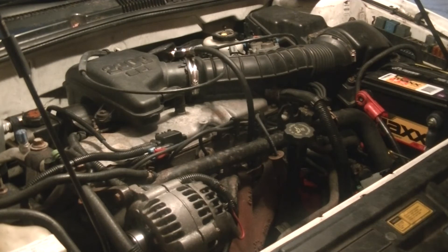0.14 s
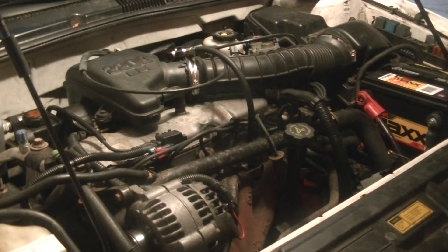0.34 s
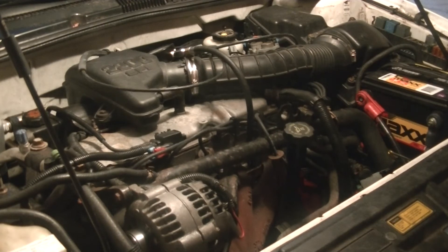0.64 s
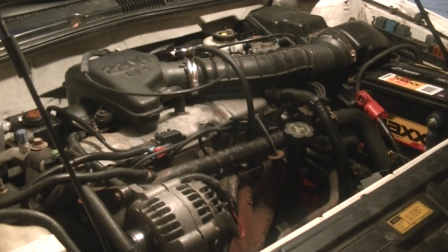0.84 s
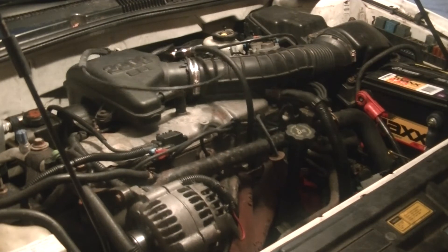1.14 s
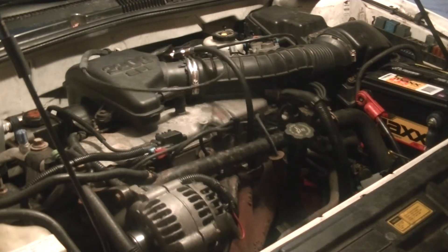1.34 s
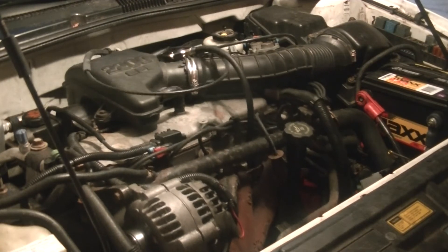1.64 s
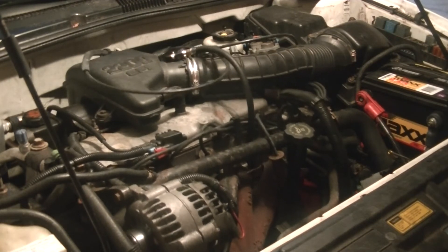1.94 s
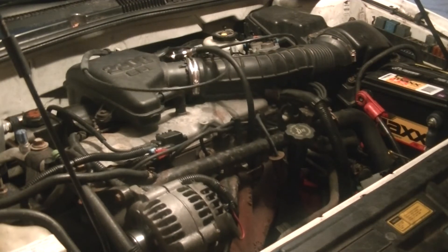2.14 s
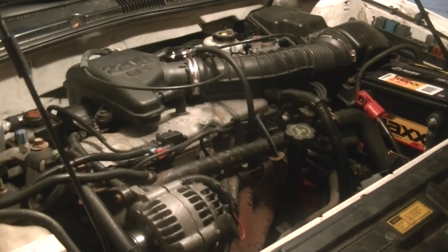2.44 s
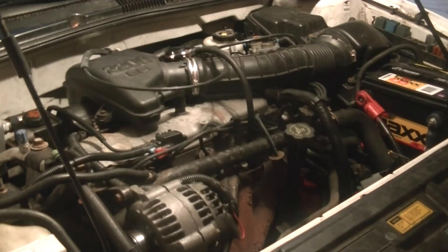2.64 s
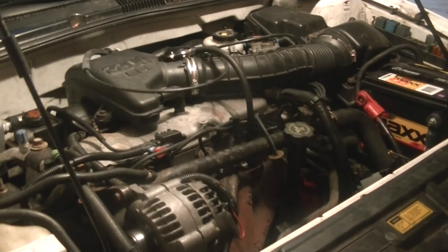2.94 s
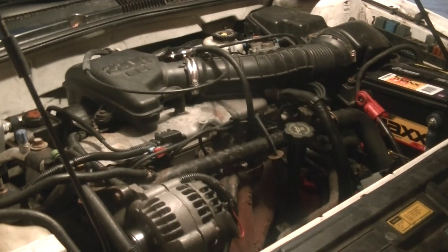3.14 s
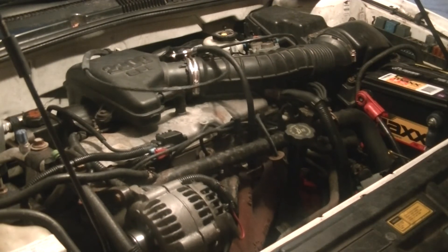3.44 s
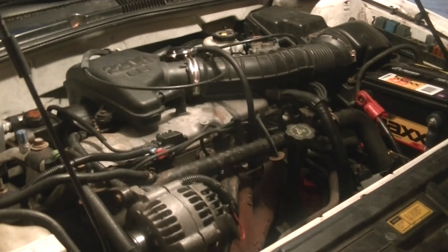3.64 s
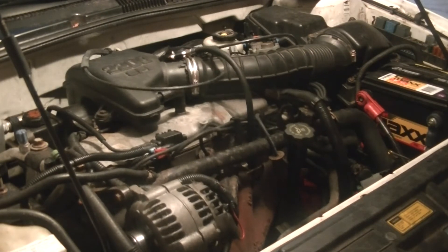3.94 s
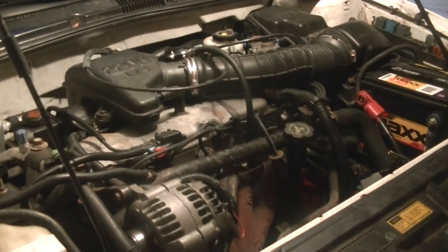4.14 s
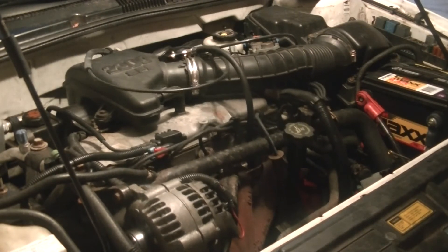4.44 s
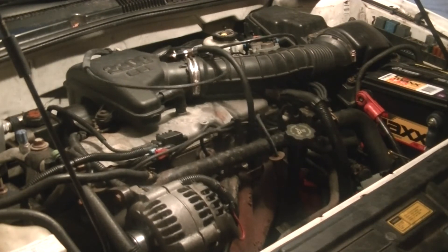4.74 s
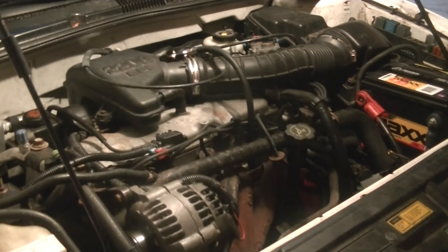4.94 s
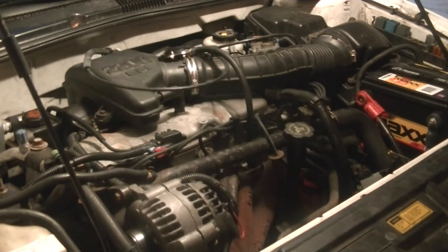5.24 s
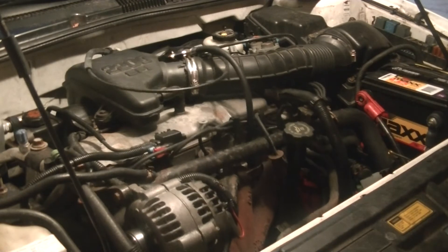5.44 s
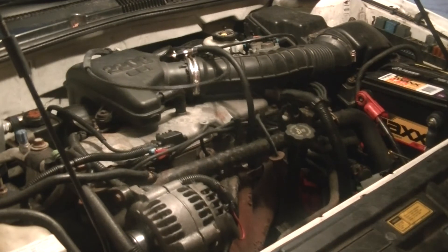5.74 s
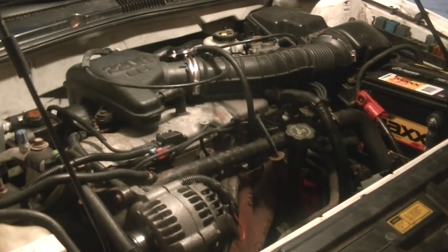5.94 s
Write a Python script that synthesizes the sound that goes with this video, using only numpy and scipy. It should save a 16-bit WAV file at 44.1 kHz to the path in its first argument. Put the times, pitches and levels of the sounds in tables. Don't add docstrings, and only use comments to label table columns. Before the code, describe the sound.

A car starter clacks into engagement, stumbles briefly, then cranks the engine over and over at about nine chugs a second without it catching.

```python
import sys
import numpy as np
from scipy import signal
from scipy.fft import rfft, irfft
from scipy.io import wavfile
from scipy.ndimage import uniform_filter1d

SR = 44100
rng = np.random.default_rng(int(sys.argv[2]) if len(sys.argv) > 2 else 0)


def to_wav(sig):
    pcm = np.clip(np.atleast_2d(sig), -1, 1) * 32767
    pcm = np.round(pcm).astype(np.int16)
    wavfile.write(sys.argv[1], SR, pcm.T)


N = 268569

# frequency in Hz, width in Hz, level in dB.
CASTING_MODES = [(770, 25, -4), (846, 18, 2), (1000, 25, -4), (1307, 35, 2), (1412, 35, 1), (1500, 30, -3),
                 (1576, 27, 0), (1710, 35, -1), (1850, 40, -1), (1900, 30, -1), (2000, 32, 1),
                 (2164, 30, 1), (2280, 30, 1), (2380, 25, 0), (2440, 30, -1), (2830, 40, -2), (3047, 40, 0),
                 (3310, 50, 0), (3420, 50, 0), (3550, 50, -1), (3821, 40, 0), (3990, 60, 0), (4168, 45, 0),
                 (4500, 60, -3), (5752, 25, -7), (6035, 30, -11)]
# frequency in Hz, width in Hz, level in dB.
SUMP_MODES = [(220, 18, -6), (258, 18, -4), (315, 20, -8), (345, 20, -7), (444, 18, -3), (515, 20, -2),
              (606, 30, 0), (650, 25, -2)]
# time in seconds, clack in dB, thud minus clack in dB, clang minus clack in dB.
FIRST_SLAMS = [
    (0.1396, -11.5, -15, -11),
    (0.2906, -15.5, -9, 2),
    (0.4261, -17.5, -9, 10),
    (0.4934, -13, -19, 3),
    (0.5975, -13, -18, 3.5),
    (0.7142, -9, -25, -8),
    (0.8187, -10.5, -18, -7),
]
# start in seconds, first clack in dB, second clack in dB, ring in dB.
TURNS = [(0.9285, -13.5, -13, -41), (1.1603, -12, -10.5, -26), (1.3902, -10.5, -11, -30),
         (1.6121, -10, -13.5, -21), (1.8266, -11, -10.5, -36), (2.0357, -15, -10, -23),
         (2.2584, -14, -9, -17), (2.4714, -13, -11, -24), (2.6886, -9, -10, -25), (2.9032, -11.5, -9, -25),
         (3.1231, -10.5, -10, -30), (3.3392, -14.5, -11, -16), (3.5551, -11, -11.5, -37),
         (3.774, -13, -13, -29), (3.9894, -9, -11, -28), (4.2084, -12, -8.5, -30),
         (4.4287, -11.5, -12.5, -29), (4.6487, -12, -11, -19), (4.8692, -10, -9, -28),
         (5.0882, -9, -9.5, -30), (5.31, -10, -13, -24), (5.5292, -10.5, -13, -24), (5.7515, -13, -9, -25),
         (5.9746, -10, -10, -20)]
PINION_HIT_S = FIRST_SLAMS[0][0]
SAG_DB_PER_S = 0.3762


def undb(db):
    return np.exp(np.asarray(db) * (np.log(10) / 20))


def unit(x):
    return x / np.sqrt(np.mean(x ** 2))


def colour(x, outline):
    hz, db = np.transpose(outline)
    size = 4096
    bins_hz = np.fft.rfftfreq(size, 1 / SR)
    log_gain = np.log(undb(np.interp(np.log(bins_hz + 1), np.log(hz), db)))
    cepstrum = irfft(log_gain)
    cepstrum[1:size // 2] *= 2
    cepstrum[size // 2 + 1:] = 0
    response = irfft(np.exp(rfft(cepstrum)))
    return signal.fftconvolve(x, response)[:N]


def walk(per_s):
    size = int(SR / per_s)
    held = np.repeat(rng.standard_normal(N // size + 1), size)
    return 0.89 * uniform_filter1d(held, size)[:N]


def ring(x, modes, narrow, wander_db=0):
    total = 0
    for k, (hz, width_hz, db) in enumerate(modes):
        drive = x * undb(wander_db * walk(per_s=30))
        b, a = signal.iirpeak(hz, hz / (narrow * width_hz), SR)
        total = total + (-1) ** k * undb(db) * signal.lfilter(b, a, drive)
    return total


def band(x, lo_hz, hi_hz):
    return signal.sosfilt(signal.butter(2, [lo_hz, hi_hz], "band", fs=SR, output="sos"), x)


def impacts(per_s, spread_db):
    when, sign, strength = rng.random((N, 3)).T
    hits = (when < per_s / SR) * np.sign(sign - .5)
    return unit(hits * undb(-spread_db * np.log(strength + 1e-9)))


def strikes(times, db, rise_s, fall_s):
    kicks = np.zeros(N)
    np.add.at(kicks, np.minimum((np.asarray(times) * SR).astype(int), N - 1), undb(db))
    t = np.arange(SR // 10) / SR
    shape = np.exp(-t / fall_s) - np.exp(-t / rise_s)
    return signal.fftconvolve(kicks, shape / shape.max())[:N]


def yard():
    # frequency in Hz, level in dB per Hz.
    outdoors = [(25, -4), (60, -8), (150, -3.5), (300, -4), (500, -1), (900, 0.5), (1500, -6.5),
                (2800, -14), (5000, -20.5), (10000, -30), (16000, -42)]
    level_db, duck_db = -37.5, -3.5
    duck = undb(duck_db * (np.arange(N) / SR > PINION_HIT_S))
    return undb(level_db) * duck * unit(colour(rng.standard_normal(N), outdoors))


def key_and_relay():
    # time in seconds, level in dB.
    contacts = [
        (.075, -42),
        (0.086, -36),
        (.094, -44),
        (0.127, -32),
    ]
    # frequency in Hz, width in Hz, level in dB.
    contact_modes = [(6600, 60, -3), (9600, 90, -14), (11400, 80, -8)]
    solenoid_s, solenoid_db = .082, -52
    s, db = np.transpose(contacts)
    knocks = strikes(s, db, 0.00055, 0.0064) * rng.standard_normal(N)
    ticks = undb(11) * band(knocks, 370, 2200) + undb(20) * ring(knocks, contact_modes, narrow=0.35)
    t = np.arange(N) / SR
    plunger_moves = (t > solenoid_s) & (t < PINION_HIT_S)
    return ticks + undb(solenoid_db) * plunger_moves * band(rng.standard_normal(N), 3000, 12000)


def strokes():
    thud_db, clang_db = (-28, -26), (-10.5, -15.5)
    thud_scatter_db, clang_scatter_db, last_half_turn_s = 1.5, 1.2, .095
    s, first_db, second_db, _ = np.transpose(TURNS)
    half_turn_s = np.append(np.diff(s) / 2, last_half_turn_s)
    chance = rng.standard_normal((len(s), 4)).T
    rows = []
    for k, (at, clack_db) in enumerate([(s, first_db), (s + half_turn_s, second_db)]):
        thud = thud_db[k] + thud_scatter_db * chance[k] - clack_db
        clang = clang_db[k] + clang_scatter_db * chance[2 + k] - clack_db
        rows.append((at, clack_db, thud, clang))
    steady = np.transpose(rows, (2, 0, 1)).reshape(-1, 4)
    return np.vstack([FIRST_SLAMS, steady])


def shaking(slam_s):
    # time in seconds, effort in dB, strain on the block in dB.
    take_up = [
        (0.135, -32, 3),
        (0.159, -11, 4.5),
        (0.179, -18.5, 2.5),
        (0.28, -15, 7.5),
        (0.31, -13, -3),
        (0.35, -13, -8),
        (0.39, -16, 9),
        (0.45, -15, 1.5),
        (0.7, -16, 3),
    ]
    # first slam of a turn in dB, second slam in dB.
    jolts = [
        (9.1, 7.2),
        (2.64, 2.3),
        (0.5, 0.58),
        (0.83, 2.8),
    ]
    jolt_falls_s = (0.035, 0.031, 0.058, 0.03)
    sump_db, block_db, wander_db = -27.5, -7, .5
    light_share, heavy_share = .8, 0.15
    t = np.arange(N) / SR
    s, effort_db, strain_db = np.transpose(take_up)
    effort = np.interp(t, s, effort_db, left=-120) - SAG_DB_PER_S * np.maximum(t - s[-1], 0)
    strain = np.interp(t, s, strain_db)
    mesh = light_share * np.minimum(strain, 0) + heavy_share * np.maximum(strain, 0)
    parts = [sump_db + strain, block_db + strain, mesh, 0]
    steady = slam_s[3:]
    gains = []
    for part, (first_db, second_db), fall_s in zip(parts, jolts, jolt_falls_s):
        jolt = first_db * strikes(steady[::2], 0, 0.0013, fall_s)
        jolt += second_db * strikes(steady[1::2], 0, 0.0014, fall_s)
        gains.append(undb(effort + part + wander_db * walk(per_s=14) + jolt))
    return gains


def rattle(slam_s):
    # frequency in Hz, level in dB per Hz.
    engine_body = [(25, -37), (90, -24), (180, -25), (230, -18.5), (420, -10.5), (620, -0.5), (900, 1.5),
                   (1150, 15.5), (1400, -4), (2200, 1), (2650, 11), (3300, 8.5), (4400, 2.5), (5200, -2),
                   (16000, -34.5)]
    sump_top_hz = 443
    sump, block, mesh, housing = shaking(slam_s)
    teeth = impacts(per_s=9000, spread_db=1.5)
    body = unit(colour(teeth, engine_body))
    body += undb(-6) * unit(ring(teeth[::-1], CASTING_MODES, narrow=0.84, wander_db=5))
    body += undb(-24) * unit(ring(teeth[::-1], SUMP_MODES, narrow=0.43, wander_db=2.5))
    deep = signal.sosfilt(signal.butter(4, sump_top_hz, fs=SR, output="sos"), body)
    low = band(body, sump_top_hz, 1464)
    middle = band(body, 1286, 2400)
    high = signal.sosfilt(signal.butter(2, 2600, "high", fs=SR, output="sos"), body)
    return sump * unit(deep) + block * unit(low) + mesh * unit(middle) + housing * unit(high)


def slams(blows):
    # frequency in Hz, level in dB per Hz.
    clack_outline = [(200, -78), (600, -11.5), (1500, -2.5), (3000, -1.5), (5000, -3), (8000, -7),
                     (10000, -10.5), (11500, -10), (13500, -27), (15600, -21)]
    # lag after the slam in seconds, level in dB.
    bounces = [
        (0, -9),
        (.016, -6.5),
        (.031, -7),
        (.045, -13),
    ]
    s, clack_db, thud_db, clang_db = np.transpose(blows)
    burst = impacts(per_s=12000, spread_db=0.6)
    clack = unit(colour(burst, clack_outline)) * strikes(s, clack_db - 6.0, 0.0014, 0.011)
    clang_drive = burst * strikes(s, clack_db + clang_db, 0.00033, 0.015)
    clang = ring(clang_drive, CASTING_MODES, narrow=4.5, wander_db=4)
    push = sum(strikes(s + lag, clack_db + thud_db + db, 0.00013, 0.00025) for lag, db in bounces)
    knock = strikes(s + 0.00172, clack_db + thud_db, .0001, 0.00044)
    thud = undb(-49) * unit(ring(push, SUMP_MODES[:4], narrow=1.6, wander_db=7.0))
    thud += undb(-42) * unit(ring(knock, SUMP_MODES[4:], narrow=0.83, wander_db=7.0))
    return clack + undb(3.5) * clang + thud


def bites(slam_s):
    # time in seconds, grind in dB.
    first_bites = [
        (0.1396, -2.5),
        (0.2394, -32),
        (0.4384, -17.5),
    ]
    lag_s, level_db, scatter_db = .056, -16.5, 1.9
    s = slam_s[3:-1] + lag_s
    db = level_db - SAG_DB_PER_S * s + scatter_db * rng.standard_normal(len(s))
    return np.vstack([first_bites, np.transpose([s, db])])


def grind(slam_s):
    # frequency in Hz, level in dB per Hz.
    scrape_outline = [(1500, -34.5), (4000, -12), (6000, -3.5), (8000, -4), (10000, -10), (12000, -13.5),
                      (14000, -21), (16000, -37)]
    t = np.arange(N) / SR
    bite_s, db = np.transpose(bites(slam_s))
    last_bite = np.searchsorted(bite_s, t) - 1
    last_slam = np.searchsorted(slam_s, t) - 1
    slam_is_newer = slam_s[last_slam] + .005 > bite_s[last_bite]
    unloaded_s = np.where(slam_is_newer, t - slam_s[last_slam], 0)
    load = undb(.5 * db[last_bite] - 18 - 147 * unloaded_s) * (last_bite >= 0)
    load = uniform_filter1d(load, size=200) + strikes(bite_s, db - 21.5, 0.00067, 0.0097)
    return load * unit(colour(impacts(per_s=12000, spread_db=2.0), scrape_outline))


def mounts(blows):
    # frequency in Hz, width in Hz, level in dB.
    rocking_modes = [(58, 28, 0), (131, 40, -2)]
    level_db, lurch_s, lurch_db = -70.5, .265, -3
    s = np.append(blows[:, 0], lurch_s)
    db = np.append(blows[:, 1] + blows[:, 2], lurch_db)
    push = strikes(s, db, 0.00065, 0.0026)
    return undb(level_db) * unit(ring(push, rocking_modes, narrow=1))


def sing(teeth, mode):
    tone = unit(ring(teeth, [mode], narrow=0.73))
    strength = uniform_filter1d(np.abs(tone), size=900) + .1
    return unit(tone / strength ** .5)


def flywheel():
    # frequency in Hz, width in Hz, level in dB.
    wheel_modes = [(924.2, 14, 0), (1093.5, 19, 0)]
    # time in seconds, level in dB.
    seating = [
        (0.15, -25),
        (0.24, -27),
        (0.4, -27),
        (0.5, -16.5),
        (0.58, -30),
        (0.79, -23),
    ]
    # time in seconds, level in dB.
    low_swells = [(0.15, -17.5), (0.19, -29), (0.23, -24), (0.27, -23), (0.385, -19), (0.41, -37),
                  (0.58, -36), (0.94, -22), (1.1, -28.5), (1.52, -41), (2.04, -25), (2.619, -31),
                  (3.0, -31), (3.33, -22), (4.26, -27), (4.43, -25), (5.27, -34.5)]
    rest_db, lag_s, rise_s, fall_s = -27.5, .005, 0.0085, 0.028
    teeth = impacts(per_s=4000, spread_db=2.5)
    worn_spot = np.array(TURNS)[:, ::3] + [lag_s, 0]
    high_swells = np.vstack([seating, worn_spot])
    rest = undb(rest_db) * (np.arange(N) / SR > PINION_HIT_S)
    total = np.zeros(N)
    for swells, mode in zip((low_swells, high_swells), wheel_modes):
        s, db = np.transpose(swells)
        total += (rest + strikes(s, db, rise_s, fall_s)) * sing(teeth, mode)
    return undb(-7.5) * total


def engine():
    blows = strokes()
    slam_s = blows[:, 0]
    surroundings = yard() + key_and_relay()
    return surroundings + rattle(slam_s) + slams(blows) + grind(slam_s) + mounts(blows) + flywheel()


def scene():
    # frequency in Hz, side minus mid in dB.
    panel_scatter = [(60, -24.5), (110, -16), (200, -17), (380, -20.5), (700, -14), (1290, -18.5),
                     (2380, -11.5), (4400, -8.5), (8120, -3.5), (15000, -3)]
    mid = engine()
    cells = signal.stft(mid, nperseg=512)[2]
    phases = np.exp(2j * np.pi * rng.random(cells.shape))
    scrambled = signal.istft(cells * phases)[1][:N]
    side = colour(scrambled, panel_scatter) * undb(1.5)
    return np.array([undb(0.97) * (mid + side), undb(2.5) * (mid - side)])


def band_limit(x):
    return signal.sosfilt(signal.butter(12, 15750, fs=SR, output="sos"), x)


def record(dry):
    flattened = dry / (1 + np.abs(dry) ** 6) ** (1 / 6)
    return band_limit(flattened)


dry = scene()
out = record(dry)
to_wav(out)
```